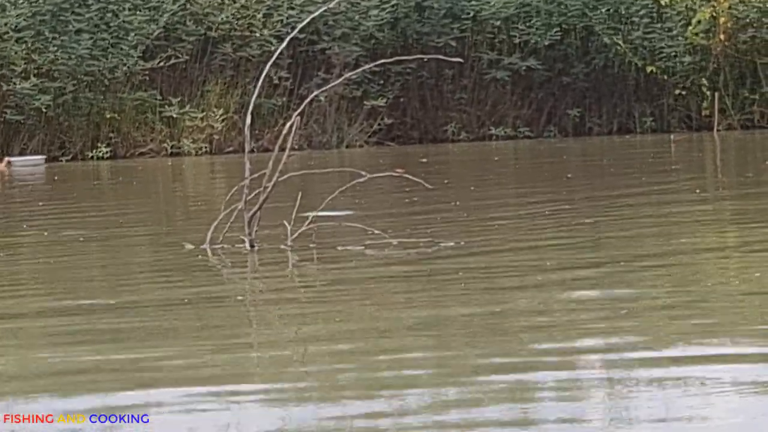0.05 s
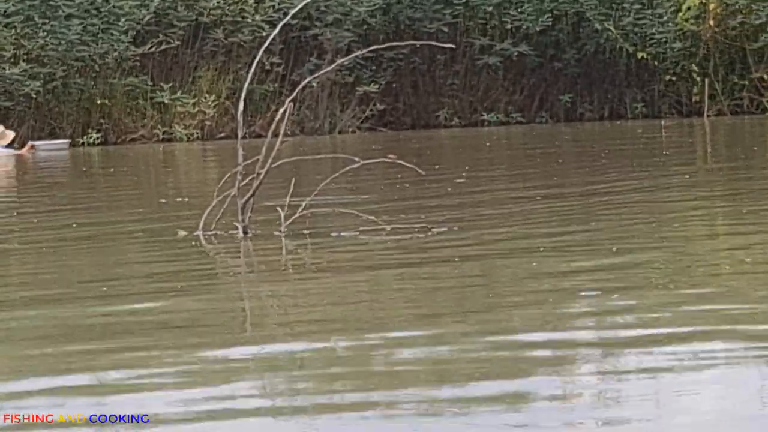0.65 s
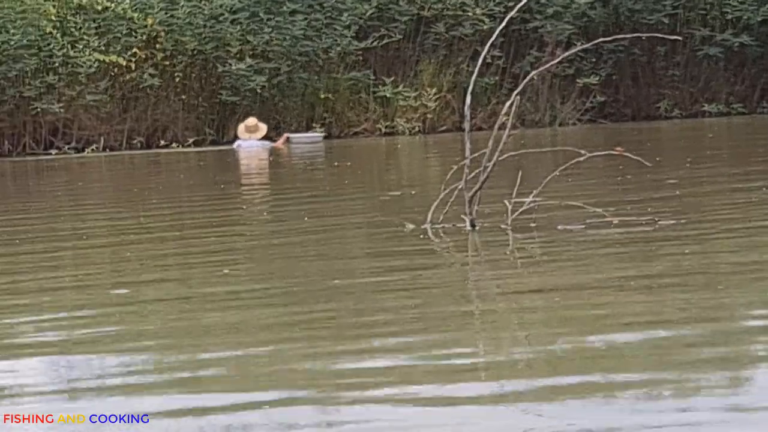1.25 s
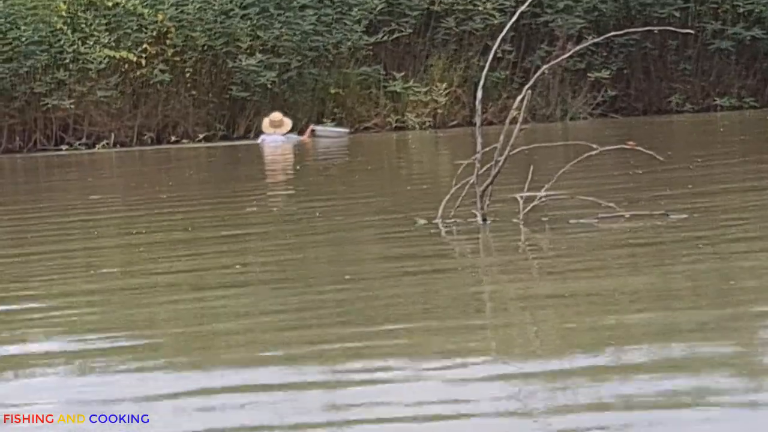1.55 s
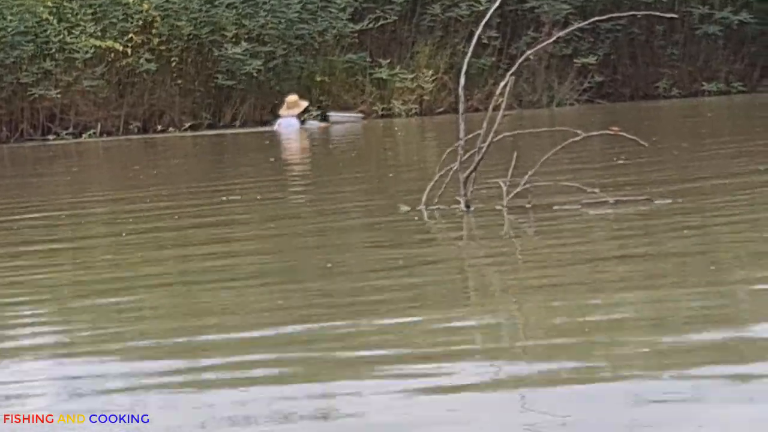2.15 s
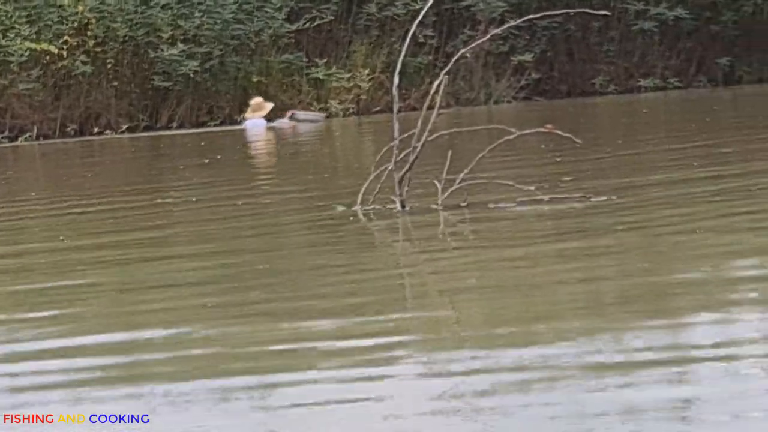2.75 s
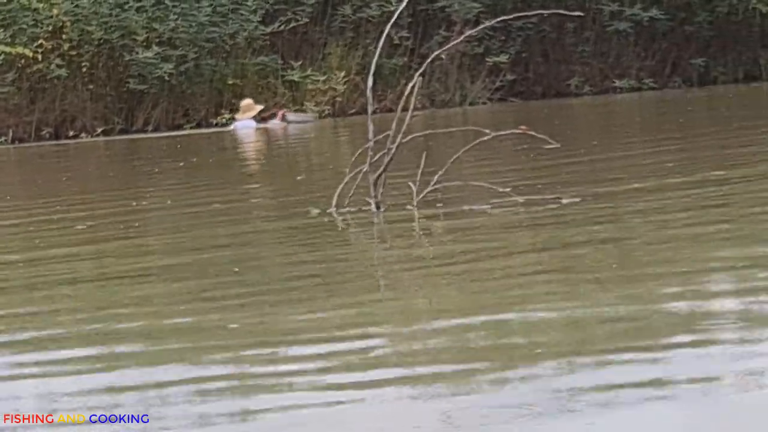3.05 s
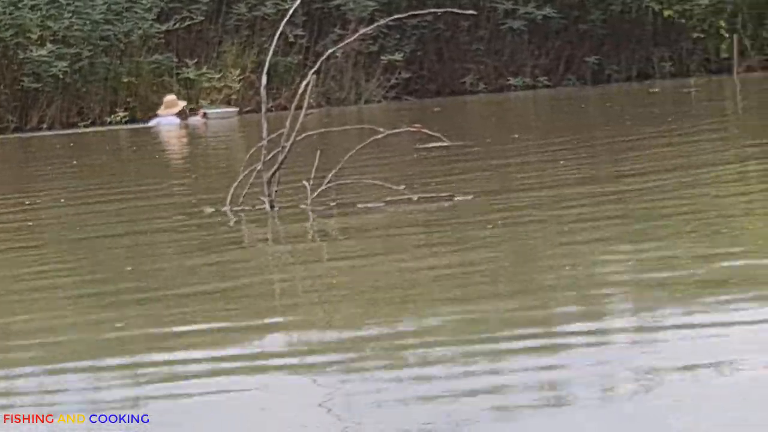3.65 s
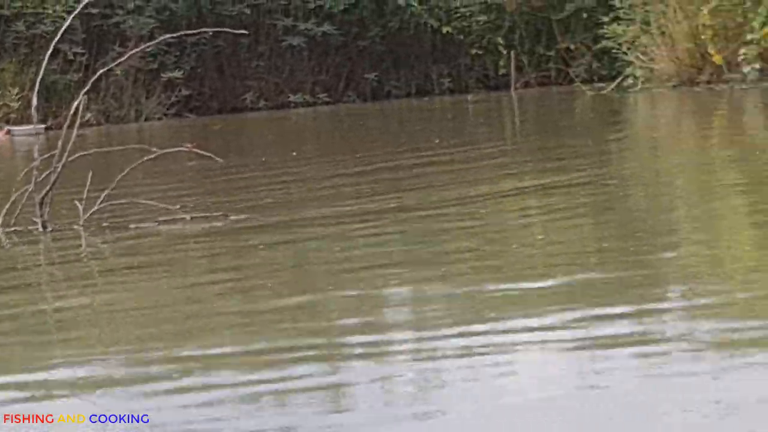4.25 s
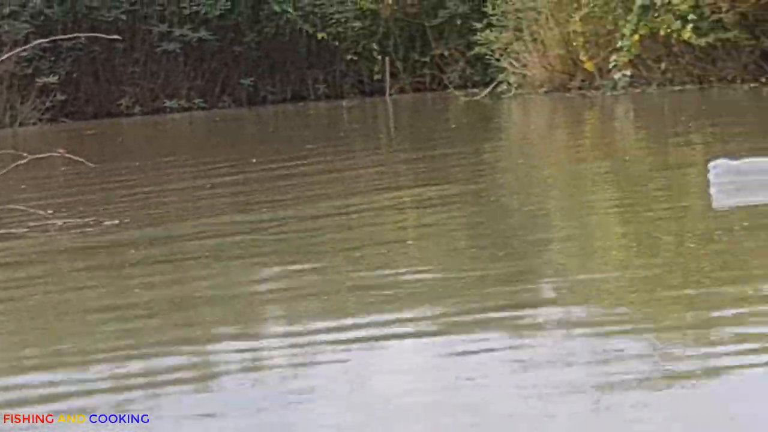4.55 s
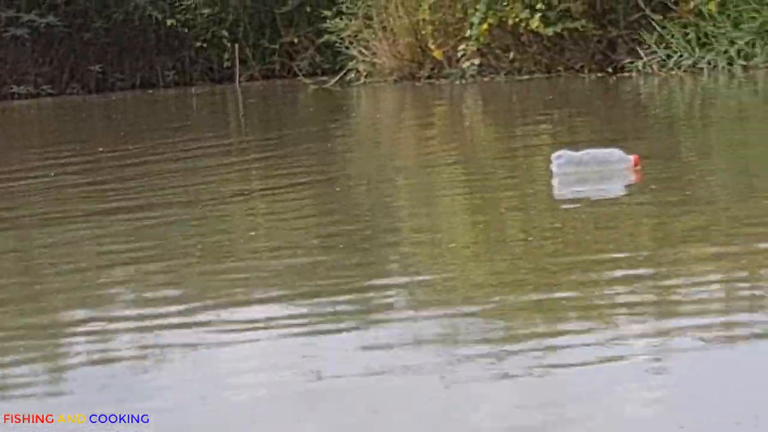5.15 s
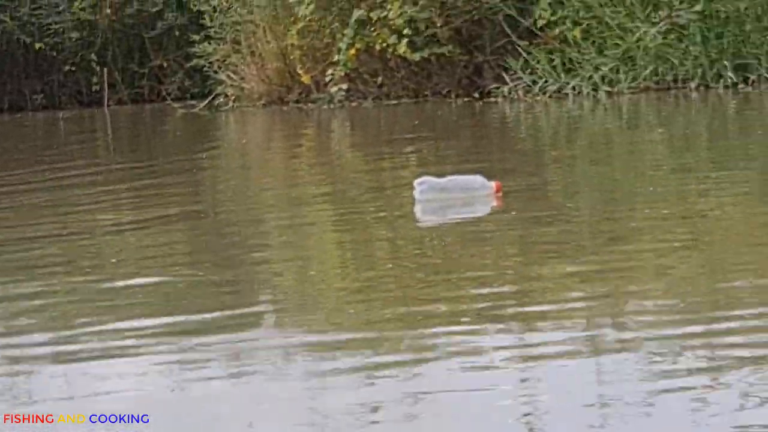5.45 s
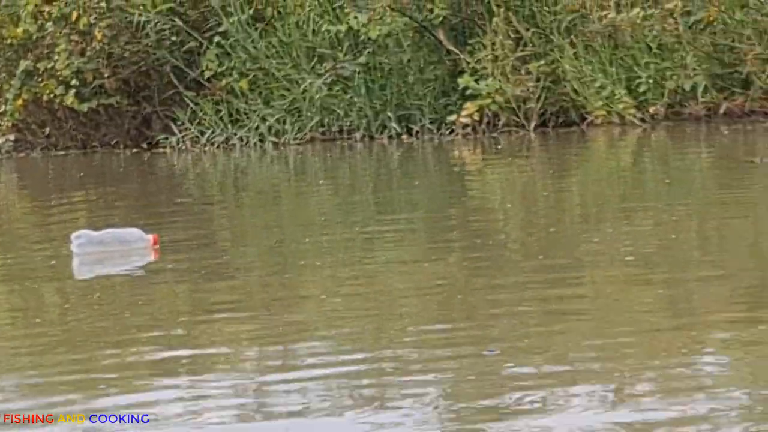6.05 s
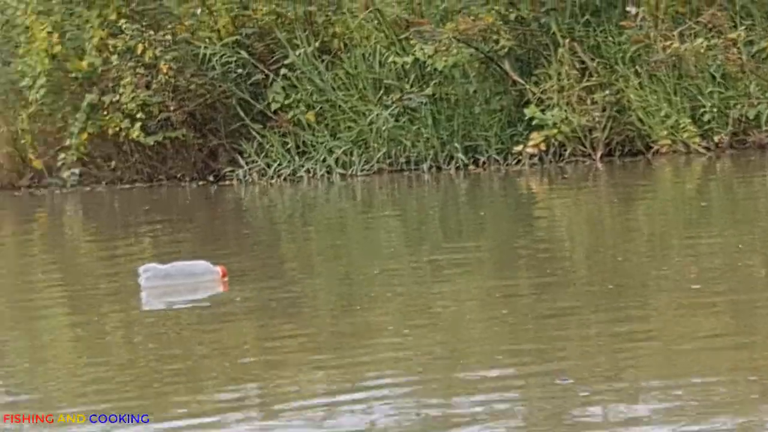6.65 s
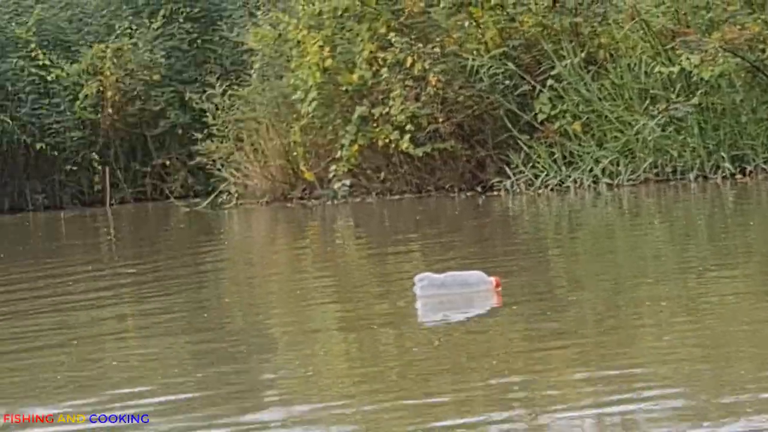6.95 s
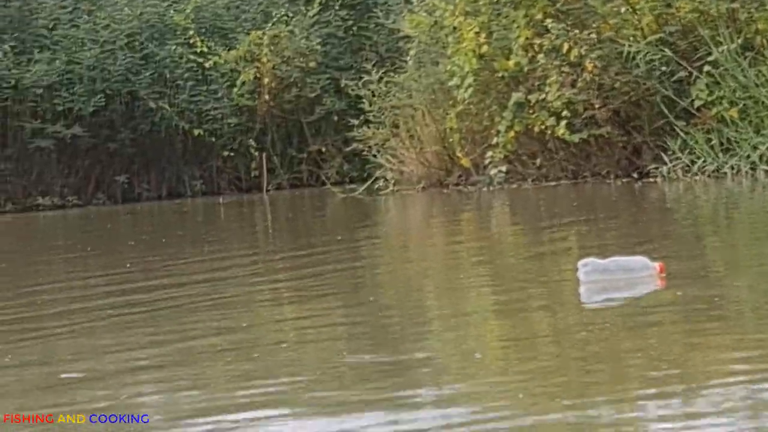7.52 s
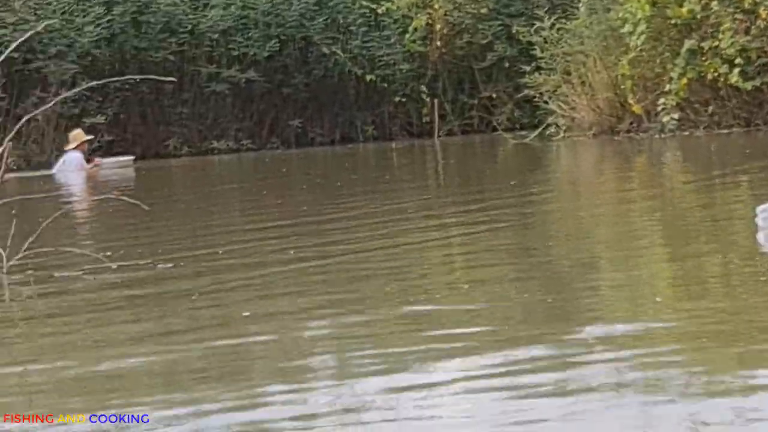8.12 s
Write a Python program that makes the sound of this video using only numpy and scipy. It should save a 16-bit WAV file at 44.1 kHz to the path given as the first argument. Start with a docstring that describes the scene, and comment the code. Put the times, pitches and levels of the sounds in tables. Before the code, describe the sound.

Three heavy distant bangs echo across a river while a small bird repeats quick, high chirping trills over a low rumble.

```python
"""Three heavy, distant bangs roll over a muddy river and thump back as echoes from its overgrown banks.
Each is a sharp pressure front, a scattered blast and a long roll, all coloured by the same resonances.
A small bird in the bushes repeats quick trills of arching tones, which the leaves scatter;
other birds whistle and insects rasp faintly further off. A low rumble of far machinery and a thin hiss
of open air lie under everything, and tiny ticks, plops and drips sound close by."""
import sys
import numpy as np
from scipy import signal
from scipy.fft import rfft, irfft, next_fast_len
from scipy.io import wavfile
from scipy.ndimage import uniform_filter1d, minimum_filter1d

SR = 44100
rng = np.random.default_rng(int(sys.argv[2]) if len(sys.argv) > 2 else 0)


def log_audio(samples):
    """Write samples as a 16-bit WAV file to the path given in sys.argv[1]."""
    # one column per channel
    frames = np.atleast_2d(samples).T
    # limit to full scale, then quantise
    limited = np.clip(frames, -1, 1)
    pcm = np.round(limited * 32767).astype(np.int16)
    wavfile.write(sys.argv[1], SR, pcm)


N = 369558
T = np.arange(N) / SR
EARS = np.array([[1], [-1]])  # left, right
FULL_VOICE_DB = -21.5  # the trilling bird at full strength

# Stereo width, narrow in the bass. Each row: frequency in Hz, side minus mid in dB.
STEREO_WIDTH = [(60, -13.5), (130, -15.5), (290, -7), (640, 0), (1300, 3.5), (2500, -1.5), (15000, 1)]
# Spectrum of a blast and of its echoes. Each row: frequency in Hz, relative density in dB.
BLAST_SPECTRUM = [(35, 0), (70, 7), (140, 12), (200, -7.5), (290, -9), (480, -16), (600, -22), (950, -30),
                  (1250, -41), (2500, -39), (3600, -52), (5000, -54.5), (9000, -83)]


def undb(db):
    """Amplitude ratio of a level in decibels."""
    return 10 ** (np.asarray(db) / 20)


def unit(x):
    """Normalisation to rms 1."""
    return x / np.sqrt(np.mean(x ** 2))


def add(out, start, x):
    """Superposition: x joins out from a start in seconds."""
    i = max(int(start * SR), 0)
    n = max(min(x.shape[-1], N - i), 0)
    out[..., i:i + n] += x[..., :n]


def gains(points, n):
    """Magnitude response through (Hz, dB) points, interpolated in log frequency."""
    hz, db = np.transpose(points)
    return undb(np.interp(np.log(np.fft.rfftfreq(n, 1 / SR) + 1e-3), np.log(np.maximum(hz, 1)), db))


def analytic(x):
    """The analytic signal: a complex form of x whose phase can be turned."""
    return signal.hilbert(x, next_fast_len(len(x)))[:len(x)]


def walk(rate_hz, n):
    """Smooth random modulation with a spread near 1."""
    hold = max(int(SR / rate_hz), 1)
    steps = np.repeat(rng.standard_normal(n // hold + 2), hold)
    return unit(uniform_filter1d(steps, hold))[:n]


def band(hz, width_hz, n):
    """Noise in one Gaussian band, rms 1."""
    bell = np.exp(-2 * ((np.fft.rfftfreq(n, 1 / SR) - hz) / width_hz) ** 2)
    return unit(irfft(rfft(rng.standard_normal(n)) * bell, n))


def glide(length, start_hz, middle_hz, end_hz, taper):
    """Frequency modulation: a tone follows a parabola through three pitches, rms 1 at its loudest."""
    progress = np.linspace(0, 1, max(int(length * SR), 8))
    hz = np.polyval(np.polyfit([0, .5, 1], [start_hz, middle_hz, end_hz], 2), progress)
    envelope = np.abs(np.sin(np.pi * progress)) ** taper
    return np.sqrt(2) * envelope * np.sin(2 * np.pi * np.cumsum(hz) / SR)


def diffuse(spectrum, n):
    """Partly coherent noise, mid at rms 1: bass nearly alike in both ears, its phase leading on the left."""
    # Share of the side signal coherent with the middle. Each row: frequency in Hz, share in dB.
    coherent_share = [(150, 3.5), (300, -1), (600, -7.5), (1200, -18), (2500, -17)]
    size = next_fast_len(n, True)
    mid, scatter = rfft(rng.standard_normal((2, size))) * gains(spectrum, size)
    coherence = np.minimum(gains(coherent_share, size), 1)
    side = gains(STEREO_WIDTH, size) * (1j * coherence * mid + np.sqrt(1 - coherence ** 2) * scatter)
    mid, side = irfft(mid, size)[:n], irfft(side, size)[:n]
    return (mid + EARS * side) / np.std(mid)


def foliage(x, near_db, near_t60, far_db, far_t60):
    """Reverberation: leaves scatter at once, the banks return a longer, weaker wash; both lose treble."""
    t = T[:SR // 2]
    response = 0
    for db, t60 in ((near_db, near_t60), (far_db, far_t60)):
        tail = rng.standard_normal((2, len(t))) * undb(-60 * t / t60) * (1 - np.exp(-t / .00086))
        response = response + undb(db) * tail / np.sqrt(np.sum(tail ** 2) / 2)
    treble_loss = gains([(3300, 0), (3900, -4), (4400, -7), (6000, -8)], len(t))
    response = irfft(rfft(response) * treble_loss, len(t))
    return signal.oaconvolve(x[None], response, axes=1)[:, :N]


def machinery():
    """Far machinery is heard as low diffuse noise whose level drifts slowly."""
    # Each row: frequency in Hz, relative density in dB.
    rumble_spectrum = [(12, -62), (20, -32), (32, -19), (40, -9.5), (48, -5), (71, 2.5), (103, -8),
                       (123, -12.5), (155, -15), (174, -23), (253, -27.5), (323, -33), (733, -44),
                       (863, -50.5), (1000, -61), (1300, -75), (2200, -120)]
    # Each row: time in seconds, level in dB.
    rumble_levels = [(0, -23), (.65, -21.5), (.95, -26), (1.801, -22), (2.8, -25), (3.301, -22.5),
                     (6.251, -24.5), (7.2, -22), (7.7, -24.5), (8.38, -23.5)]
    return undb(np.interp(T, *np.transpose(rumble_levels))) * diffuse(rumble_spectrum, N)


def open_air():
    """Broadband hiss under random amplitude modulation: the middle wavers and the treble flickers."""
    # Each row: frequency in Hz, relative density in dB.
    hiss_spectrum = [(590, -31), (1000, 0.5), (1230, -1), (1430, 3.5), (1580, 0.5), (2340, -3),
                     (3780, -7.5), (4440, -6), (5590, -9.5), (7360, -9), (9910, -17), (13200, -13.5),
                     (15500, -45)]
    # Trend of the hiss above 6 kHz. Each row: time in seconds, gain in dB.
    treble_trend = [(0, 1.5), (.7, 1), (1.1, -1), (5, 0), (8.38, -2.5)]
    hiss = undb(np.interp(T, [0, T[-1]], [-58, -59.5])) * diffuse(hiss_spectrum, N)
    treble = signal.sosfiltfilt(signal.butter(2, 6000, "high", fs=SR, output="sos"), hiss)
    for hz in (1000, 1500, 2200, 3300, 4800):
        bandpass = signal.butter(2, [hz / 1.25, hz * 1.25], "band", fs=SR, output="sos")
        hiss = hiss + (undb(1.3 * walk(7, N)) - 1) * signal.sosfiltfilt(bandpass, hiss)
    flicker_db = np.interp(T, *np.transpose(treble_trend)) + 2.2 * walk(20, N)
    return hiss + treble * (undb(flicker_db) - 1)


def crackle():
    """Sparse random impulses make a very fine crackle in the top octave."""
    out, t, count = np.zeros((2, N)), T[:SR // 200], 90
    when, left_shares = rng.random((2, count))
    sizes = undb(-61.5 + 3.5 * np.minimum(rng.exponential(size=count), 3))
    for start, size, left in zip(when * T[-1], sizes, left_shares):
        click = size * np.exp(-t / .0013) * band(12000, 6000, len(t))
        add(out, start, np.sqrt([[left], [1 - left]]) * click)
    return out


def burst(hz, width_hz, decay_s):
    """A transient: band noise with an exponential decay, uncorrelated between the ears."""
    t = T[:SR // 8]
    return np.exp(-t / decay_s) / 2 * np.array([band(hz, width_hz, len(t)) for _ in range(2)])


def drips_and_twigs():
    """Drips and twig snaps along the bank are faint narrow-band transients at random times."""
    out = np.zeros((2, N))
    for when, pitch, softness in rng.random((45, 3)):
        hz = 1300 * 3 ** pitch
        add(out, when * T[-1], undb(-52 - 9 * softness) * burst(hz, hz / 3, decay_s=.005))
    return out


def plop(hz, decay_s):
    """Damped resonance: a small cavity rings briefly at an unsteady pitch."""
    t = T[:SR // 8]
    ring = np.exp(1j * (2 * np.pi * hz * t + walk(450, len(t))))
    ear_phases = np.exp(.5j * rng.standard_normal((2, 1)))
    return np.real(ring * ear_phases) * (1 - np.exp(-t / .0004)) * np.exp(-t / decay_s)


def ticks_and_plops():
    """Close transients: dry ticks of noise a little to the right, and duller cavity resonances."""
    # Each row: start in seconds, centre in Hz, bandwidth in Hz, level in dB.
    ticks = [(.052, 11500, 5000, -45), (.132, 8200, 1500, -40), (.196, 10500, 4000, -40),
             (.2225, 9500, 7000, -32), (.2402, 13800, 2400, -21), (.539, 12000, 6000, -42),
             (.762, 7800, 3200, -37), (1.934, 8800, 3500, -40), (2.021, 8500, 3000, -46),
             (2.329, 9800, 3000, -45), (3.3992, 13000, 6000, -42), (4.0946, 8000, 4000, -44),
             (4.7207, 13000, 6000, -39), (4.946, 3800, 2000, -41), (6.415, 6600, 1100, -36),
             (7.517, 5700, 900, -41), (7.558, 4500, 1100, -39)]
    # Each row: start in seconds, resonance in Hz, decay time in seconds, level in dB.
    plops = [(.2225, 1760, .0045, -32), (2.14, 1200, .02, -54), (2.15, 2800, .015, -53),
             (2.21, 1200, .015, -52), (2.685, 1600, .02, -55), (5.205, 1900, .005, -44),
             (8.258, 1650, .005, -43), (8.258, 3300, .006, -50)]
    out, pan_db = np.zeros((2, N)), -4
    for start, hz, width_hz, db in ticks:
        add(out, start, undb(db + EARS * pan_db / 2) * burst(hz, width_hz, decay_s=.00075))
    for start, hz, decay_s, db in plops:
        add(out, start, undb(db) * plop(hz, decay_s))
    return out


def insects():
    """Stridulation in the reeds: the strokes of a wing file pulse a high band of noise."""
    # Each row: midpoint in seconds, length in seconds, level in dB.
    rasps = [(1.54, 0.14, -65), (1.83, 0.31, -61.5), (4.869, 0.17, -56), (5.168, 0.19, -60),
             (6.597, 0.079, -62.5), (6.924, 0.098, -64), (7.625, 0.14, -56), (7.879, 0.26, -62.5)]
    out, stroke_hz = np.zeros((2, N)), 170
    for middle, length, db in rasps:
        n = int(length * SR)
        strokes = 1 + .27 * np.sin(2 * np.pi * stroke_hz * T[:n])
        noise = np.array([band(7780, 920, n) for _ in range(2)])
        add(out, middle - length / 2, undb(db) * np.hanning(n) ** .5 * strokes * noise)
    return out


def whistle(length, start_hz, middle_hz, end_hz, flutter_db):
    """A far whistled note that flutters by random amplitude modulation."""
    note = glide(length, start_hz, middle_hz, end_hz, taper=.029)
    return undb(flutter_db * walk(130, len(note))) * note


def chorus():
    """Many far birds peep independently: nearly steady tones within a narrow range of pitch."""
    out, centre_hz, spread_hz = np.zeros(N), 4450, 130
    for when, length, pitch, softness in rng.random((60, 4)):
        hz = centre_hz + spread_hz * (2 * pitch - 1)
        note = glide(.03 + .08 * length, hz * 1.02, hz, hz * .98, taper=1)
        add(out, when * T[-1], undb(-63 - 10 * softness) * note)
    return out


def twitter():
    """Birds deep in the bushes chirp at random in short, faint frequency sweeps."""
    out = np.zeros(N)
    for when, length, pitch, bend, softness in rng.random((170, 5)):
        hz = 1600 + 2400 * pitch
        note = glide(.015 + .03 * length, hz * (.85 + .4 * bend), hz, hz * .9, taper=1)
        add(out, when * T[-1], undb(-61.5 - 10 * softness) * note)
    return out


def hidden_birds():
    """Falling slurs and nearly level peeps, made slightly hoarse by random phase modulation."""
    # Each row: start and length in seconds, middle pitch in Hz, level in dB, fractional fall per half.
    slurs = [(.41, 0.078, 4050, -48, 0.17), (2.133, 0.074, 2070, -64, 0.063),
             (3.573, 0.047, 2520, -57, 0.16), (3.79, 0.028, 2650, -48, .07),
             (4.584, 0.063, 3000, -57, 0.046), (5.4, 0.11, 2300, -69, .06), (6.0, 0.029, 2930, -62, .07),
             (6.733, 0.039, 2920, -58, .08)]
    # Each row: start and length in seconds, pitch in Hz, level in dB.
    peeps = [(0.218,0.046,4650,-51), (1.957,0.031,4590,-64), (2.196,0.017,4500,-47.5),
             (2.222,0.08,4590,-60), (2.416,0.044,4200,-60), (2.511,0.028,4400,-59), (3.06,0.039,4500,-53),
             (3.16,0.051,4400,-67), (3.328,0.018,4600,-54), (3.42,0.03,4330,-58), (3.681,0.032,5550,-56),
             (3.726,0.051,4420,-60), (4.017,0.036,4410,-54.5), (4.165,0.065,4350,-58)]
    out, peep_fall = np.zeros(N), .025
    for start, length, hz, db, fall in list(slurs) + [(*peep, peep_fall) for peep in peeps]:
        add(out, start, undb(db) * whistle(length, hz * (1 + fall), hz, hz * (1 - fall), flutter_db=4.5))
    return np.real(analytic(out) * np.exp(.8j * walk(600, N)))


def chips():
    """Two-voice sound: after a rising lead-in and a flick, both sides of the syrinx fall together."""
    # Each row: time in seconds, level in dB.
    calls = [(3.266, -43.5), (3.395, -40.5), (3.464, -46.5), (5.594, -42), (5.72, -39), (5.851, -41.5),
             (5.929, -42)]
    out = np.zeros(N)
    for time, db in calls:
        add(out, time - .018, undb(db - 11) * glide(.02, 4100, 4400, 4650, taper=.6))
        add(out, time, undb(db - 8) * glide(.007, 3600, 4400, 4850, taper=1))
        add(out, time + .004, undb(db - 4) * glide(.024, 4700, 3900, 3300, taper=.8))
        add(out, time + .006, undb(db - 6) * glide(.02, 5200, 4400, 3600, taper=.8))
    return out * undb(3 * walk(500, N))


def far_birds():
    """Scattering in the bushes softens the far birds; twitter and chorus have no direct path."""
    sharp, hidden = chips(), hidden_birds()
    voices = sharp + hidden + twitter() + chorus()
    return .7 * sharp + .3 * hidden + foliage(voices, near_db=2, near_t60=.1, far_db=-5, far_t60=.36)


def low_bird():
    """A low call from far across the water wavers by random phase modulation."""
    # Each row: offset and length in seconds, start, middle and end pitch in Hz, relative level in dB.
    notes = [(0, .045, 870, 1090, 1230, -1.5), (.04, .12, 1165, 1200, 1150, -.5),
             (.168, .045, 1060, 1150, 1030, -.5), (.25, .03, 1030, 1155, 1010, 0),
             (.36, .1, 1065, 1148, 1030, -1)]
    # Each row: start of the phrase in seconds, level in dB, fade in dB per second (negative grows).
    calls = [(.34, -58, 4), (2.722, -56.5, 0), (3.37, -66, 40), (3.62, -64.5, 40), (6.465, -63, -18)]
    voice = np.zeros(N)
    for start, db, fade_rate in calls:
        for offset, length, start_hz, middle_hz, end_hz, note_db in notes:
            note = whistle(length, start_hz, middle_hz, end_hz, flutter_db=3.5)
            add(voice, start + offset, undb(db + note_db - fade_rate * offset) * note)
    voice = np.real(analytic(voice) * np.exp(.5j * walk(140, N)))
    return .85 * voice + foliage(voice, near_db=-7, near_t60=.05, far_db=-8, far_t60=.32)


def arch(length, start_hz, middle_hz, end_hz):
    """A rising and falling sweep whose growing gain keeps it strong on the way down."""
    note, swell_db = glide(length, start_hz, middle_hz, end_hz, taper=.63), 5.5
    return note * undb(swell_db * np.linspace(-.5, .5, len(note)))


def syllable(full_hz, flick_db, first_db, gap_s, second_db, top_s):
    """Source and filter: two soft flicks, two rasping arches and a faint spit pass through the throat."""
    # Passband of the throat. Each row: frequency in Hz, gain in dB.
    throat_response = [(2400, -24), (2750, -11), (3100, 4.5), (3500, -0.5), (4000, -2), (4500, 1),
                       (4750, -3), (5000, -9), (6000, -18)]
    out, jitter = np.zeros(SR // 10), rng.standard_normal(6)
    hz = full_hz + 8 * (first_db - FULL_VOICE_DB)  # softer syllables sit a little lower
    fall = glide(.007, hz + 50, hz - 250, hz - 1100, taper=1.1)
    rise = glide(.0045, hz - 900, hz - 100, hz + 300, taper=1.1)
    first = arch(.0095 * (1 + .05 * jitter[1]), hz - 900, hz + 40, hz - 950 + 70 * jitter[4])
    second = arch(.0108 * (1 + .1 * jitter[2]), hz - 650 + 150 * jitter[5],
                  hz + 265 + 50 * jitter[3], hz - 900 + 120 * jitter[4])
    spit = np.hanning(SR // 150) * band(7200, 1400, SR // 150)
    parts = [(top_s - .0225, first_db + flick_db + 2 * jitter[0], fall),
             (top_s - .0122, first_db - 10.5 + 2 * jitter[5], rise),
             (top_s - len(first) / SR / 2, first_db, first),
             (top_s + gap_s - len(second) / SR / 2, second_db, second),
             (top_s + gap_s, second_db - 28, spit)]
    for start, db, part in parts:
        add(out, start, undb(db - 2) * part)
    rasp = undb(2 * walk(1100, len(out)))
    return irfft(rfft(out * rasp) * gains(throat_response, len(out)))


def trills():
    """Multipath propagation: each syllable of the trill scatters along new paths through the leaves."""
    # Each row: top of the first arch in seconds, its level in dB, gap to the second top in seconds,
    # the second arch's level in dB.
    syllables = [(0.0308,-23.5,0.02,-29.5), (0.19,-25.5,0.023,-28), (0.3474,-25,.021,-26.5),
                 (0.515,-25,0.021,-29), (2.824,-41.5,0.022,-40), (2.976,-31.5,0.02,-40.5),
                 (3.11,-31.5,0.022,-35), (3.247,-28,0.022,-32), (3.377,-29.5,0.024,-32),
                 (3.5189,-26,0.023,-29), (3.668,-22,0.022,-26.5), (3.808,-25,.0225,-26),
                 (3.9556,-25,0.02,-31.5), (4.098,-27,0.02,-31), (4.243,-28.5,0.022,-26.5),
                 (4.4012,-23.5,0.021,-24), (4.554,-23,0.023,-25.5), (4.699,-24,0.022,-25),
                 (4.845,-23,0.023,-23), (4.9893,-24,.023,-25.5), (6.296,-37.5,.0195,-37.5),
                 (6.441,-38.5,0.021,-36), (6.5829,-37.5,0.018,-32), (6.72,-30,0.02,-27.5),
                 (6.8577,-24.5,0.023,-30.5), (7.0103,-23,0.022,-28.5), (7.153,-25.5,0.022,-33),
                 (7.315,-26,0.022,-32.5), (7.452,-25,.022,-29.5), (7.611,-22,0.021,-30),
                 (7.774,-23.5,0.022,-27)]
    # The trill's pitch, flick level and apparent direction, which shifts as the microphone turns.
    # Each row: time in seconds, full-voice pitch in Hz, relative level of the opening flick in dB,
    # phase lead of the left ear in radians.
    trill_drift = [(0, 4065, -10, -0.81), (.6, 4035, -18, -1.1), (2.8, 4040, -13, -0.65),
                   (3.6, 4040, -16, -1.05), (4.4, 4096, -13.5, -0.45), (5, 4110, -13.5, .1),
                   (6.8, 4100, -10, 1), (7.8, 4080, -17, 0.29)]
    out = np.zeros((2, N))
    pan_db, blur_rad, lead_in_s = -1.5, .3, .03  # slightly to the right; twigs blur the phase
    times, *drift = np.transpose(trill_drift)
    for top, first_db, gap_s, second_db in syllables:
        hz, flick_db, lead_rad = (np.interp(top, times, column) for column in drift)
        voice = syllable(hz, flick_db, first_db, gap_s, second_db, lead_in_s)
        ear_phases = EARS * (lead_rad / 2 + blur_rad * walk(38.6, len(voice)))
        direct = np.real(analytic(voice) * np.exp(1j * ear_phases)) * undb(EARS * pan_db / 2)
        add(out, top - lead_in_s, direct)
        # softer syllables are sung facing away, so more of them arrives by way of the leaves
        away_db = .42 * max(FULL_VOICE_DB - first_db, 0)
        scattered = foliage(voice, near_db=-5, near_t60=.11, far_db=-13.5, far_t60=.55)
        add(out, top - lead_in_s, undb(away_db) * scattered)
    return out


def interference(x):
    """Paths of unequal length reinforce and cancel: bands above the bass swell and sink independently."""
    n, depth_db, rate_hz = x.shape[-1], 3.5, 16
    quarter_octave = np.clip(4 * np.log2(np.fft.rfftfreq(n, 1 / SR) / 110 + 1e-9), 0, 20)
    spectrum, out = rfft(x), 0
    for k in range(21):
        swell = unit(undb(depth_db * walk(rate_hz, n))) if k else 1
        out = out + swell * irfft(spectrum * np.maximum(1 - np.abs(quarter_octave - k), 0), n)
    return out


def bang_colour(spectrum, bright_db, punch_db):
    """Resonances shape a bang's spectrum; brightness shelves it above the bass, punch lifts 550 Hz."""
    # Each row: centre in Hz, width in Hz, lift in dB.
    resonances = [(180, 22, 5.5), (268, 84, 5.5), (393.5, 37, 6), (492.7, 9, 10), (573, 6.8, -3.5),
                  (696, 28, 4), (778, 76, 5.5), (921, 13, 7), (1110, 32, 5), (1567, 53, 8)]
    hz = np.geomspace(20, 16000, 700)
    base_hz, base_db = np.transpose(spectrum)
    db = np.interp(np.log(hz), np.log(base_hz), base_db) + bright_db * np.interp(hz, [140, 300], [0, 1])
    for centre_hz, width_hz, lift_db in [*resonances, (550, 140, punch_db)]:
        db = db + lift_db * np.exp(-2 * ((hz - centre_hz) / width_hz) ** 2)
    return np.column_stack([hz, db])


def echoes():
    """Diffuse reflection: earth banks return a bang dull, tree lines return it bright."""
    # Each row: arrival in seconds, level in dB, brightness in dB.
    reflections = [(1.274,-21,-7), (1.391,-24.5,7.5), (1.475,-27,7), (1.534,-20.5,-3), (3.909,-24.5,18.5),
                   (4.07,-13.5,-12), (4.214,-27.5,16), (4.301,-23.5,7), (4.335,-23.5,6), (4.52,-31,-8),
                   (6.43,-21.5,15), (6.7,-25.5,10), (6.834,-28.5,14.5), (6.91,-29.5,8.5)]
    out, t = np.zeros((2, N)), T[:SR // 3]
    hz, db = bang_colour(BLAST_SPECTRUM, bright_db=0, punch_db=0).T
    envelope = (1 - np.exp(-t / .0063)) * np.exp(-t / .058)
    for arrival, echo_db, bright_db in reflections:
        colour = np.column_stack([hz, db + bright_db * np.interp(hz, [400, 1500], [0, 1])])
        add(out, arrival, undb(echo_db) * envelope * interference(diffuse(colour, len(t))))
    return out


def thumps():
    """Only low notes survive a long path: a push over the ground, then hollow rings off the banks."""
    # Each row: midpoint in seconds, length in seconds, middle pitch in Hz, level in dB.
    arrivals = [(1.045, .08, 489.3, -26.5), (1.058, .075, 66.6, -6.5), (1.117, .055, 62, -7.5),
                (1.215, .09, 182.8, -14.5), (1.278, .09, 172.2, -13.5), (1.27, .14, 282, -24.5),
                (1.292, .055, 70.96, -10.5), (1.28, .08, 880, -48), (1.385, .05, 178.4, -19.5),
                (1.4, 0.087, 897, -45), (1.405, .13, 62.5, -13.5), (1.508, .05, 74.4, -13),
                (3.86, .085, 66.8, -2), (3.838, .07, 390, -23.5), (3.86, .1, 500, -24),
                (3.91, .11, 291.4, -22), (3.935, .04, 60.2, -10.5), (3.965, .045, 175, -17),
                (3.995, .045, 60.8, -6.5), (4.036, .045, 63, -6.5), (4.078, .035, 156.4, -13.5),
                (4.116, .08, 67.2, -0.5), (4.125, .06, 245, -24.5), (4.192, .045, 59, -7.5),
                (4.338, 0.058, 797, -44), (4.362, .065, 63, -9), (4.46, .045, 181, -25.5),
                (4.537, .08, 67, -11), (6.39, .08, 69.6, -2), (6.425, .07, 401, -28.5),
                (6.478, .06, 56.5, -5), (6.492, .05, 162, -18), (6.596, .05, 181.5, -17.5),
                (6.643, .08, 65.1, -4), (6.708, .075, 59.1, -6), (6.808, .07, 71.5, -13),
                (6.893, .075, 67.8, -8)]
    out = np.zeros((2, N))
    for middle, length, hz, db in arrivals:
        thump = undb(db) / np.sqrt(2) * glide(length, .907 * hz, hz, .86 * hz, taper=1.03)
        left_lead = undb(np.interp(hz, *np.transpose(STEREO_WIDTH)))  # phase leads in the left ear
        add(out, middle - length / 2, np.real(analytic(thump) * (1 + 1j * left_lead * EARS)))
    return out


def roll(bright_db, n):
    """The reverberant field of a bang: deep diffuse noise, made uneven by interference."""
    # Each row: frequency in Hz, relative density in dB.
    roll_spectrum = [(30, -24.5), (65, 7), (110, -6.5), (175, -6), (280, -13), (500, -25.5), (900, -33.5),
                     (1250, -47.5), (2600, -45.5), (3600, -49.5), (5000, -75), (9000, -78.5)]
    return interference(diffuse(bang_colour(roll_spectrum, bright_db, punch_db=0), n))


def pressure_front(spectrum):
    """A minimum-phase pulse, peak 1, that starts sharply and rings on in its resonances."""
    n = SR // 5
    cepstrum = irfft(np.log(gains(spectrum, n)), n)
    causal_fold = np.r_[1, np.full(n // 2 - 1, 2), np.zeros(n - n // 2)]
    pulse = irfft(np.exp(rfft(cepstrum * causal_fold)), n)
    return -pulse / np.abs(pulse).max()


def bangs():
    """Direct sound, early scattering and reverberation: a sharp front, a dull blast, then a long roll."""
    # Each row: start in seconds, level of front and blast in dB, level of the roll in dB, brightness
    # in dB, punch in dB, extra fade of the blast in dB per second, rise time of the roll in seconds.
    events = [(1.008, 2, 2.5, -1, 3, 0, 0.034), (3.804, 1, -0.5, 3, 6.5, 7.5, 0.078),
              (6.342, 1, 1.5, -3, 4.5, 37, 0.25)]
    # Envelope of a blast. Each row: time after its start in seconds, relative level in dB.
    blast_envelope = [(0, -18.5), (.025, -7.5), (.065, -13), (.12, -20.5), (.25, -34), (.6, -80.5)]
    out, t, early = np.zeros((2, N)), T[:3 * SR // 2], T[:SR // 2]
    front_delay_s, roll_t60 = .0034, 2.25
    for start, db, roll_db, bright_db, punch_db, fade_rate, rise_s in events:
        colour = bang_colour(BLAST_SPECTRUM, bright_db, punch_db)
        add(out, start + front_delay_s, undb(db - 9.5) * pressure_front(colour))
        clumps_db = 2.5 * walk(90, len(early))
        fade_db = np.interp(early, *np.transpose(blast_envelope)) - fade_rate * early
        envelope = undb(db + fade_db + clumps_db) * (1 - np.exp(-early / .0011))
        add(out, start, interference(envelope * diffuse(colour, len(early))))
        # the banks return the roll in uneven waves
        waves = undb(roll_db - 17 - 60 * t / roll_t60 + 2 * walk(22, len(t))) * (1 - np.exp(-t / rise_s))
        add(out, start, waves * roll(bright_db / 2, len(t)))
    return out


def scene():
    """Superposition at the river bank; background and bangs lean slightly to the right."""
    lean_db = -.7
    distant = (machinery() + open_air() + bangs() + echoes() + thumps()) * undb(EARS * lean_db / 2)
    birds = trills() + low_bird() + far_birds()
    return distant + birds + insects() + ticks_and_plops() + drips_and_twigs() + crackle()


def record(dry):
    """A limiter turns down peaks beyond full scale, and a steep low-pass filter cuts the top."""
    window, cutoff_hz = SR // 100, 15700
    needed_gain = 1 / np.maximum(np.abs(dry).max(axis=0), 1)
    gain = uniform_filter1d(minimum_filter1d(needed_gain, window), window)
    return signal.sosfilt(signal.ellip(8, .2, 70, cutoff_hz, fs=SR, output="sos"), dry * gain)


dry = scene()
out = record(dry)
log_audio(out)
```